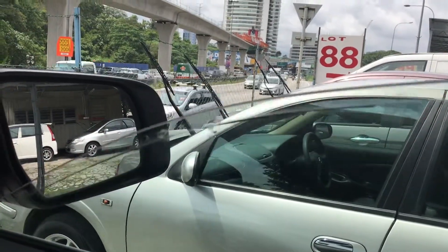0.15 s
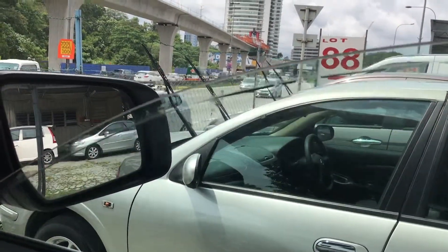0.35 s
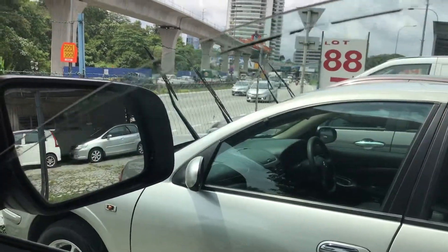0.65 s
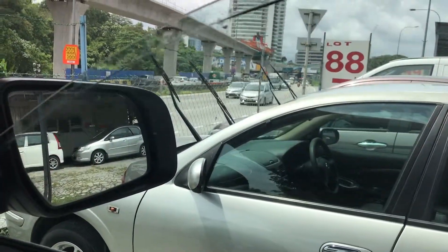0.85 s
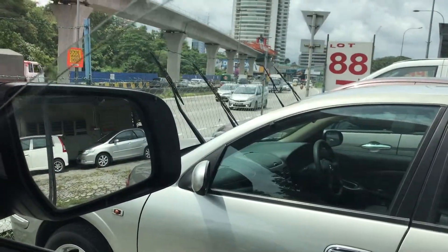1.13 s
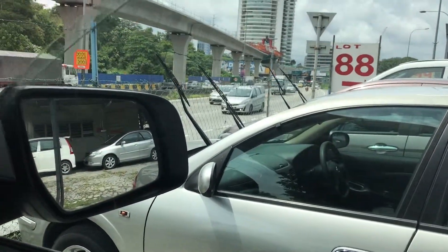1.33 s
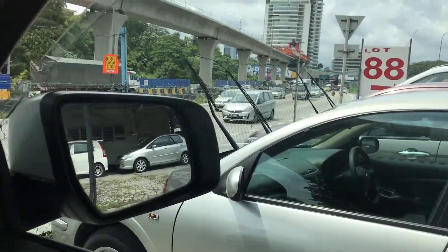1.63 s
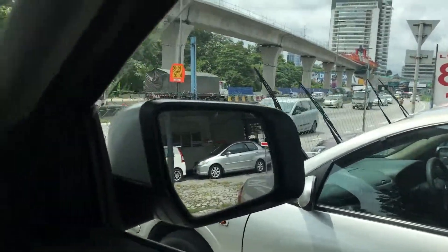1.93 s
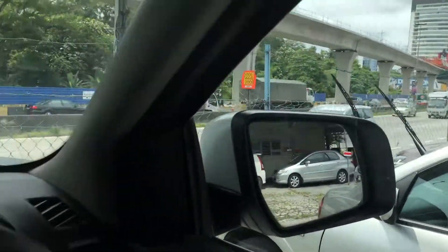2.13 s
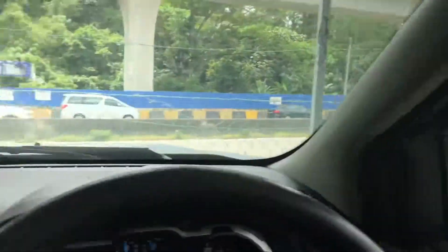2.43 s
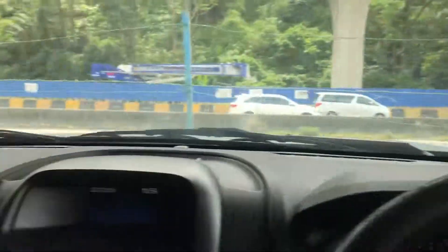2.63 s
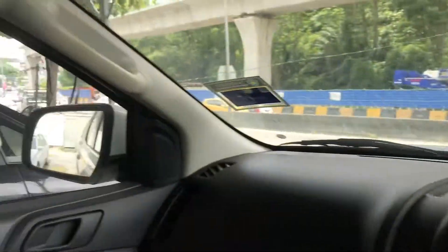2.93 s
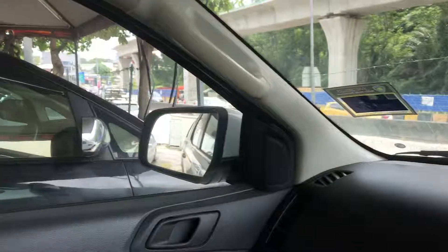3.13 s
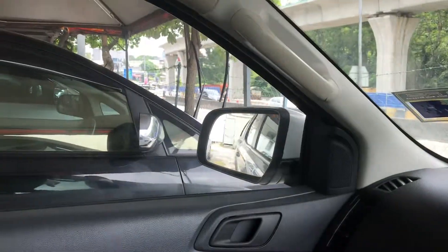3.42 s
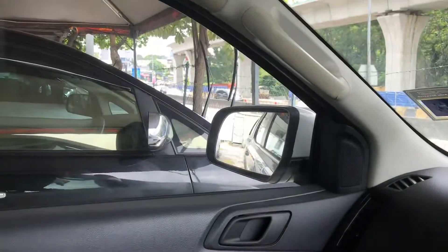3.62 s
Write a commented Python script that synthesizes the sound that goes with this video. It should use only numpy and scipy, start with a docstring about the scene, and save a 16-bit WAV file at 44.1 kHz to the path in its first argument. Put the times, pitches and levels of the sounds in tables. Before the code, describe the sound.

An electric car window winds up from the start, heard inside an idling car, its motor whining and the glass hissing along the rubber. Road roar fades as the gap narrows. At about 2.2 seconds the glass rubs into the seal and thuds shut, cutting off the motor and traffic. A plastic switch clicks around 2.3 and 2.5 seconds. A low idle throb and cabin hush remain until nearly 4 seconds.

```python
"""An electric window winds up, heard inside a parked car idling beside a busy road.
The motor whines, the glass hisses in its rubber channels and the road roar shrinks with the gap.
The glass wipes into the top seal and thuds home, and the plastic switch clicks back.
That leaves the throb and clatter of the idle over the muffled hush of the sealed cabin."""
import sys
import numpy as np
from scipy import signal
from scipy.io import wavfile
from scipy.ndimage import uniform_filter1d

SR = 44100
rng = np.random.default_rng(int(sys.argv[2]) if len(sys.argv) > 2 else 0)


def unload_wav(signal):
    """Save mono or channel-first audio to the path in sys.argv[1] as 16-bit WAV at rate SR, clipped to [-1, 1]."""
    wavfile.write(
        sys.argv[1],
        SR,
        np.round(np.clip(np.atleast_2d(signal).T, -1, 1) * 32767).astype(np.int16),
    )


N = 166257
T = np.arange(N) / SR
SEAL_S = 2.205  # the glass closes the gap


def amp(db):
    """dB to gain."""
    return 10 ** (np.asarray(db) / 20)


def unit_rms(x):
    """Scales to rms 1."""
    return x / np.sqrt(np.mean(abs(x) ** 2) + 1e-20)


def curve(table, column=1):
    """One column of a time table as an automation curve."""
    rows = np.array(table)
    return np.interp(T, rows[:, 0], rows[:, column])


def eq_db(spectrum, hz):
    """An EQ curve in log frequency, rolling off 18 dB an octave below its points and 12 above."""
    points_hz, db = np.transpose(spectrum)
    octaves_below = np.maximum(np.log2(points_hz[0] / (hz + 1)), 0)
    octaves_above = np.maximum(np.log2((hz + 1) / points_hz[-1]), 0)
    return np.interp(np.log(hz + 1), np.log(points_hz + 1), db) - 18 * octaves_below - 12 * octaves_above


def drift(rate_hz):
    """A random modulator of rms 1, moving no faster than rate_hz."""
    hz = np.geomspace(rate_hz / 20, rate_hz, 16)[:, None]
    t = T[::64]
    waves = np.sin(2 * np.pi * (hz * t + rng.random((16, 1)))) / np.sqrt(hz)
    return np.interp(T, t, unit_rms(waves.sum(0)))


def noise(spectrum, patchy_db):
    """Coloured noise of rms 1 with drifting louder and softer patches."""
    frames, hz = N // 512 + 6, np.fft.rfftfreq(2048, 1 / SR)
    real, imag, patches = rng.standard_normal((frames, 1025, 3)).T
    patches = unit_rms(uniform_filter1d(uniform_filter1d(patches, size=16, axis=0), size=6, axis=1))
    bins = (real + 1j * imag) * amp(eq_db(spectrum, hz)[:, None] + patchy_db * patches)
    return unit_rms(signal.istft(bins, nperseg=2048, noverlap=1536)[1][:N])


def band(x, hz, width_hz):
    """A sweepable resonance applied twice, output at rms 1."""
    carrier = np.exp(2j * np.pi * np.cumsum(hz * np.ones(N)) / SR)
    pole = np.exp(-np.pi * width_hz / SR)
    return unit_rms((carrier * signal.lfilter([1], [1, -2 * pole, pole ** 2], x / carrier)).real)


def until(s, fade_s):
    """Holds at 1 until s, then dies away."""
    return np.exp(-np.maximum(T - s, 0) / fade_s)


def swell(t, peak_s):
    """Rises to 1 at peak_s, then decays."""
    return t / peak_s * np.exp(1 - t / peak_s)


# Room tone of the sealed cabin. Each row: frequency in Hz, relative level in dB.
CABIN_EQ = [(24, -20), (36, -8), (60, 0.5), (120, -3), (187, -5.5), (270, -9.5), (459, -18.5), (1030, -25),
            (1810, -32), (2670, -41), (4300, -45.5), (6000, -52.5), (9400, -53), (12000, -59), (15500, -49)]
# Fader ride of the rustle, up after the switch is let go. Each row: time in seconds, level in dB.
RUSTLE_LEVEL = [(2.25, -74), (2.4, -72), (2.48, -64), (2.6, -66.5), (2.95, -74.5), (3.77, -75.5)]

def cabin():
    """A bed of muffled road and ventilation, with a flickering treble rustle."""
    rustle = amp(curve(RUSTLE_LEVEL) + 2.2 * drift(300))
    rustle *= noise([(5000, -3), (9000, -2), (12000, 0), (15000, -5)], patchy_db=.8)
    return amp(-42.5 + .33 * drift(20)) * noise(CABIN_EQ, patchy_db=1) + rustle


# Cabin squeaks. Each row: start and length in seconds, first and last pitch in Hz, level in dB.
SQUEAK_GLIDES = [(3.0, .05, 11800, 12700, -84), (3.11, .13, 13250, 13050, -85),
                 (3.26, .09, 12300, 10900, -86)]

def squeaks():
    """Thin gliding tones, barely above the hiss."""
    out = np.zeros(N)
    for start, length, first_hz, last_hz, db in SQUEAK_GLIDES:
        progress = np.clip((T - start) / length, 0, 1)
        turns = np.cumsum(first_hz + (last_hz - first_hz) * progress) / SR
        envelope = amp(db + 2 * drift(100)) * np.sin(np.pi * progress) ** .5
        out += envelope * np.sqrt(2) * np.sin(2 * np.pi * turns)
    return out


# Low throb of the idle. Each row: multiple of the firing rate, level in dB.
IDLE_ORDERS = [(1, -62), (2, -45.5), (3, -49.5), (4, -49), (5, -51), (6, -53.5), (7, -50), (9, -59.5),
               (10, -58.5)]
# Tone of the engine clatter. Each row: frequency in Hz, relative level in dB.
CLATTER_EQ = [(600, -16), (1000, 11), (1300, -1), (1750, 3), (2050, -17), (2350, 1), (2700, -22),
              (4400, -18), (5000, -25)]

def engine(firing_hz=26.8, first_firing_s=.032, puff_s=.003):
    """Wavering harmonics of the firing rate, and a puff of clatter at each firing."""
    firings = firing_hz * (T - first_firing_s)
    throb = np.zeros(N)
    for order, db in IDLE_ORDERS:
        level = amp(db + 3 * drift(14))
        throb += level * np.sin(2 * np.pi * (order * firings + .16 * drift(16) + rng.random()))
    strength = amp(rng.uniform(-2.88, 2.88, size=200))[np.floor(firings).astype(int) + 1]
    puffs = strength * swell((firings % 1) / firing_hz, puff_s)
    return np.sqrt(2) * throb + amp(-64) * unit_rms(puffs * noise(CLATTER_EQ, patchy_db=3))


# Road fading as the gap shrinks. Each row: time in seconds, roar before trim in dB, rumble in dB.
ROAD_LEVELS = [(0, -33.5, -33), (.3, -34, -33), (.6, -35, -33.5), (.9, -38.5, -33), (1.2, -38.5, -34),
               (1.5, -39.5, -36.5), (1.75, -41.5, -39), (1.88, -43, -40.5), (1.98, -45, -40.5),
               (2.1, -50, -43.5), (2.2, -48.5, -53)]
# Tyre hiss of a passing car. Each row: time in seconds, level in dB.
TYRE_LEVEL = [(0, -55), (.3, -51.5), (.55, -53.5), (.9, -69), (1.2, -85)]
# Tone of the roar (gap wide, gap narrow) and rumble. Each row: frequency in Hz, relative level in dB.
WIDE_GAP_EQ = [(250, -4), (400, -8.5), (600, -2), (900, 2.5), (1300, -1.5), (1800, -5.5), (2800, -15),
               (3300, -22), (5000, -27.5), (9000, -34.5)]
NARROW_GAP_EQ = [(250, -6.5), (400, -3), (600, -2.5), (900, 2), (1300, 0.5), (1800, -2.5), (2800, -9.5),
                 (3300, -18), (5000, -18.5), (9000, -32)]
RUMBLE_EQ = [(36, -36), (48, -26), (64, -0.5), (100, -1), (125, -3), (177, 2.5), (216, -8.5), (255, -4.5),
             (330, -14), (420, -18)]

def road(roar_trim_db=2.5):
    """Roar, rumble and two bands of tyre hiss come through the gap until the glass seals it."""
    closed = np.clip(T / SEAL_S, 0, 1)
    wide = np.sqrt(1 - closed) * noise(WIDE_GAP_EQ, patchy_db=1)
    narrow = np.sqrt(closed) * noise(NARROW_GAP_EQ, patchy_db=2)
    roar = amp(curve(ROAD_LEVELS) + roar_trim_db) * (wide + narrow)
    high_hiss = band(rng.standard_normal(N), hz=5990, width_hz=2900)
    low_hiss = amp(.5) * band(rng.standard_normal(N), hz=2790, width_hz=450)
    tyres = amp(curve(TYRE_LEVEL)) * (high_hiss + low_hiss)
    rumble = amp(curve(ROAD_LEVELS, column=2)) * noise(RUMBLE_EQ, patchy_db=.5)
    return (roar + rumble + tyres) * until(SEAL_S, fade_s=.028)


# Switch and trim clicks. Each row: start in seconds, rough peak level in dB,
# treble tilt in dB per octave, burst length in seconds.
CLICK_CUES = [(2.3058, -26.5, -.5, .0025), (2.3302, -37, -1, .01), (2.4560, -34.5, 1.5, .005),
              (2.4602, -33.5, -1.5, .006), (3.5868, -43, -.5, .012), (.429, -39, 12, .003),
              (2.2765, -52, 2, .004), (2.394, -58, 2, .005), (2.81, -56, 0, .008), (3.092, -59, 14, .003),
              (3.6871, -53, 3, .008)]
# Ring of the plastic. Each row: frequency in Hz, relative level in dB, seconds to fall 60 dB.
PLASTIC_MODES = [(750, -5, .022), (900, -2, .022), (1450, 1, .011), (1770, 0, .013), (2400, -4, .007),
                 (3330, -3, .008), (4100, -4, .007), (5900, -7, .004), (7000, -11, .0037), (8600, -7, .004),
                 (11500, -9, .003), (13000, -6, .004), (14700, -12, .003)]

def clicks(attack_s=.0004, tail_s=.013):
    """Each click is a short burst of impacts ringing the same plastic modes."""
    out, t = np.zeros(N + 4000), np.arange(2000) / SR
    attack = np.sin(np.pi / 2 * np.minimum(t / attack_s, 1)) ** 2
    for start, peak_db, tilt_db, length in CLICK_CUES:
        ring = sum(amp(db + tilt_db * np.log2(hz / 1400) - 60 * t / t60) * np.sin(2 * np.pi * hz * t)
                   for hz, db, t60 in PLASTIC_MODES)
        burst = rng.standard_normal(len(t)) * (np.exp(-2 * t / length) + .1 * np.exp(-t / tail_s))
        hit = np.convolve(burst, attack * ring)
        rough_peak = 3 * np.sqrt(np.mean(hit[:300] ** 2))
        out[round(start * SR):][:len(hit)] += amp(peak_db) * hit / rough_peak
    return out[:N]


# Fader ride of the sliding glass. Each row: time in seconds, level before trim in dB.
SLIDE_LEVEL = [(0, -59), (.45, -56.5), (.8, -54.5), (1.2, -56), (1.7, -53.5), (2.09, -52), (2.16, -49),
               (2.2, -52)]
# Bright tone of glass on rubber. Each row: frequency in Hz, relative level in dB.
SLIDE_EQ = [(2500, -15), (3500, 0), (6000, 0), (9000, 0), (12500, 1), (15500, -4)]

def glass_slide(trim_db=4):
    """The glass hisses along its rubber channels until it seats."""
    level = amp(curve(SLIDE_LEVEL) + trim_db + .63 * drift(60.4))
    return level * noise(SLIDE_EQ, patchy_db=1.75) * until(SEAL_S, fade_s=.0067)


# Upward sweep of the wipe. Each row: time in seconds, centre in Hz, lower band's level in dB.
WIPE_SWEEP = [(2.104, 1900, -70), (2.114, 1940, -49), (2.135, 2200, -45), (2.152, 2470, -44.5),
              (2.165, 2600, -62)]

def seal_wipe(width_hz=760):
    """The glass edge rubs into the top seal: grit through two rising bands."""
    grit = rng.standard_normal(N) * amp(1.4 * drift(150))
    hz = curve(WIPE_SWEEP)
    rub = band(grit, hz, width_hz) + amp(1.5) * band(grit, 1.38 * hz, 5 * width_hz)
    gate = (T > WIPE_SWEEP[0][0]) & (T < WIPE_SWEEP[-1][0])
    return amp(curve(WIPE_SWEEP, column=2)) * rub * gate


# Door modes woken by the knock. Each row: frequency in Hz, peak level in dB, seconds to peak.
DOOR_MODES = [(130, -27, .022), (185, -31, .013), (400, -38, .008), (560, -42, .007)]

def glass_thud(start_s=2.192, thud_hz=62.5, sag_turns=1.38, sag_s=.011, attack_s=.012, decay_s=.026):
    """The glass hits home: a thud whose pitch sags, a knock that rings the door, a crunch on top."""
    t = np.maximum(T - start_s, 0)
    turns = thud_hz * t + sag_turns * (1 - np.exp(-t / sag_s))
    envelope = (1 - np.exp(-t / attack_s)) ** 2 * np.exp(-t / decay_s)
    thud = amp(-11.5) * envelope * (np.sin(2 * np.pi * turns) - .27 * np.cos(4 * np.pi * turns))
    knock = amp(-28.5) * swell(t, peak_s=.005) * np.sin(2 * np.pi * 310 * t + .45)
    door = sum(amp(db) * swell(t, peak_s) * np.sin(2 * np.pi * hz * t) for hz, db, peak_s in DOOR_MODES)
    crunch = amp(-45) * swell(t, peak_s=.0057) * band(rng.standard_normal(N), hz=2000, width_hz=1200)
    return thud + knock + door + crunch


# Motor whine. Each row: time in seconds, pitch in Hz, whine level in dB, sub-octave level in dB.
MOTOR_WHINE = [(0, 1165, -45, -65), (.1, 1160, -40, -50), (.22, 1165, -34, -55), (.27, 1175, -49, -60),
               (.4, 1195, -40.5, -49), (.58, 1212, -39, -46), (.8, 1208, -42, -44.5), (1.0, 1252, -39, -53),
               (1.06, 1228, -40, -51), (1.18, 1222, -43.5, -47), (1.27, 1205, -46, -60),
               (1.46, 1180, -45, -47.5), (1.6, 1205, -46, -49.5), (1.77, 1248, -39.5, -47.5),
               (1.86, 1272, -54, -50.5), (1.98, 1276, -49, -48), (2.015, 1287, -42.5, -52),
               (2.056, 1290, -35, -50), (2.145, 1286, -39.5, -50), (2.166, 1259, -48, -45.5),
               (2.2, 1240, -46, -46.5), (2.217, 1150, -45, -57), (2.23, 1000, -43, -58)]
# Roughness of the whine. Each row: time in seconds, phase wobble in radians.
MOTOR_ROUGHNESS = [(0, 1.2), (.25, 1.2), (.45, .6), (1.9, .5), (2.02, .1), (2.25, .1)]

def window_motor(stop_s=2.219, max_fuzz=.35):
    """Two commutator tones an octave apart, slightly fuzzy, that sag as the glass stalls."""
    roughness = curve(MOTOR_ROUGHNESS)
    phase = 2 * np.pi * np.cumsum(curve(MOTOR_WHINE)) / SR + roughness * drift(60)
    fuzz = 1 + np.minimum(max_fuzz, roughness) * drift(200)
    whine = amp(curve(MOTOR_WHINE, column=2) + 1.2 * drift(7.1)) * np.sin(phase)
    sub_octave = amp(curve(MOTOR_WHINE, column=3) + 1.2 * drift(11)) * np.sin(phase / 2)
    return np.sqrt(2) * fuzz * (whine + sub_octave) * until(stop_s, fade_s=.005)


def scene():
    """The mono mix: the window closing on the road, over the sounds of the car."""
    closing = window_motor() + road() + glass_slide() + seal_wipe() + glass_thud() + clicks()
    return (closing + engine() + cabin() + squeaks())[None]


# Dips in the microphone's treble. Each row: centre in Hz, width in Hz, gain in dB.
TREBLE_DIPS = [(4920, 270, -4.5), (7650, 250, -3), (10580, 570, -5)]

def record(dry, cutoff_hz=15800):
    """The microphone's colour, then a steep high cut."""
    hz = np.linspace(0, SR / 2, 513)
    colour = amp(sum(db * np.exp(-((hz - centre) / width) ** 2) for centre, width, db in TREBLE_DIPS))
    coloured = signal.oaconvolve(dry, signal.firwin2(511, hz, colour, fs=SR)[None], "same")
    high_cut = signal.firwin(1023, cutoff_hz, window=("kaiser", 10), fs=SR)
    return signal.oaconvolve(coloured, high_cut[None], "same")


dry = scene()
out = record(dry)
unload_wav(out)
```